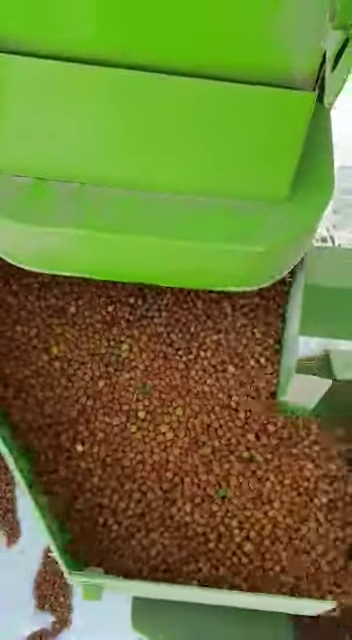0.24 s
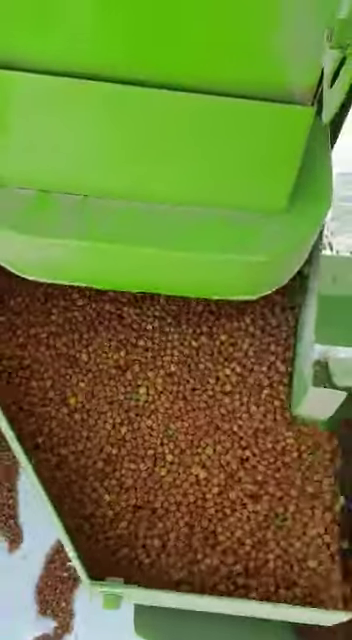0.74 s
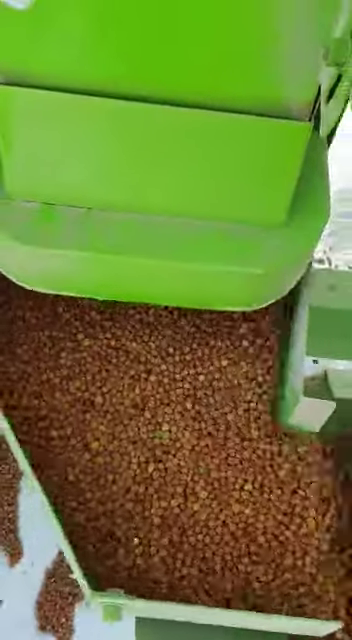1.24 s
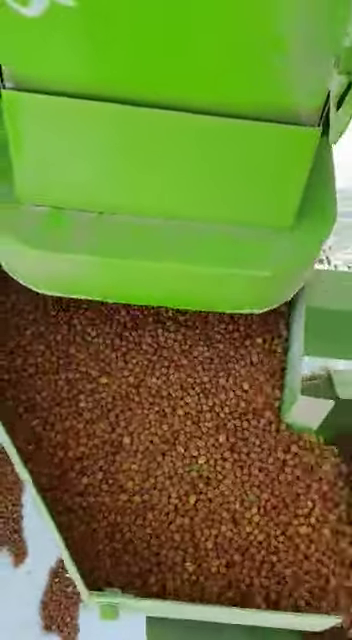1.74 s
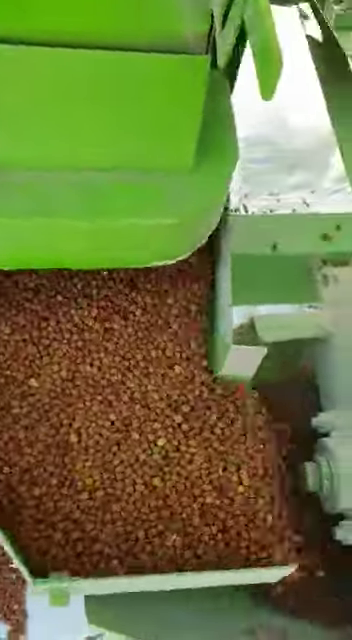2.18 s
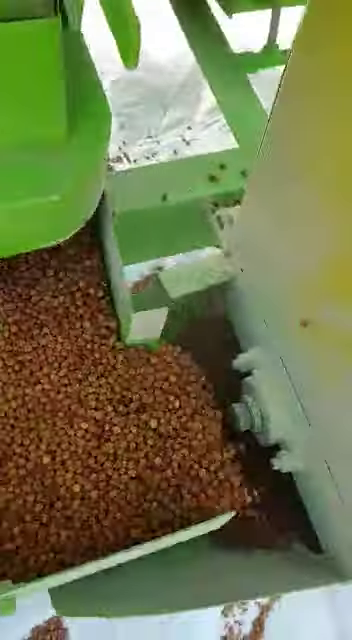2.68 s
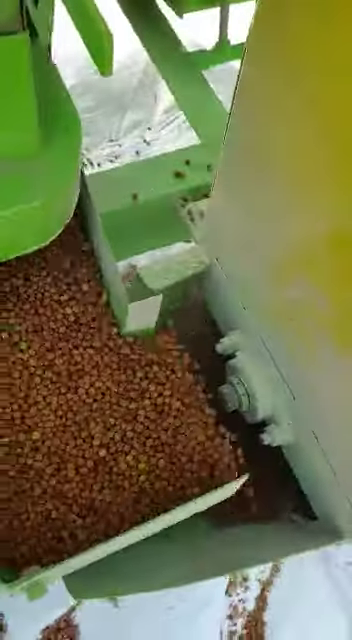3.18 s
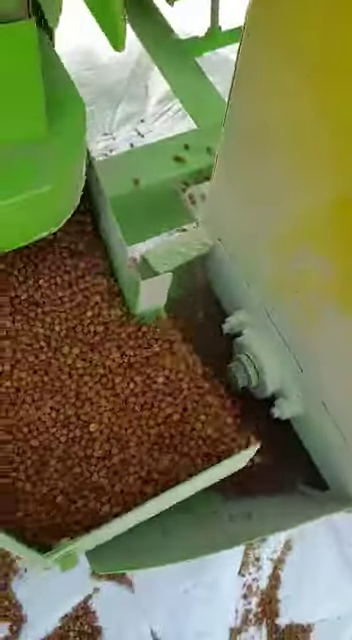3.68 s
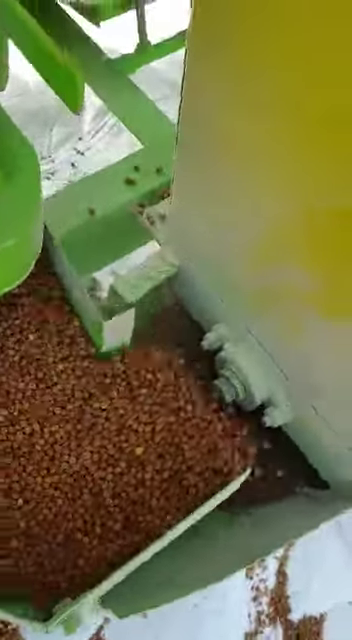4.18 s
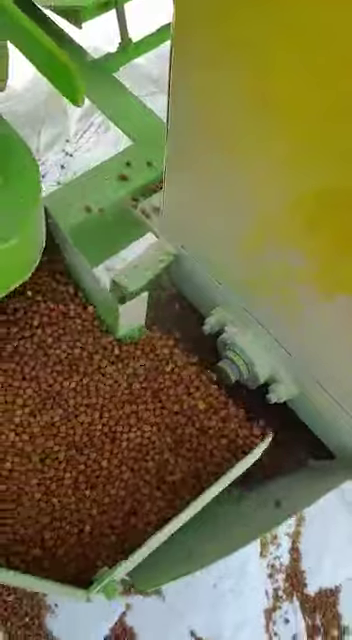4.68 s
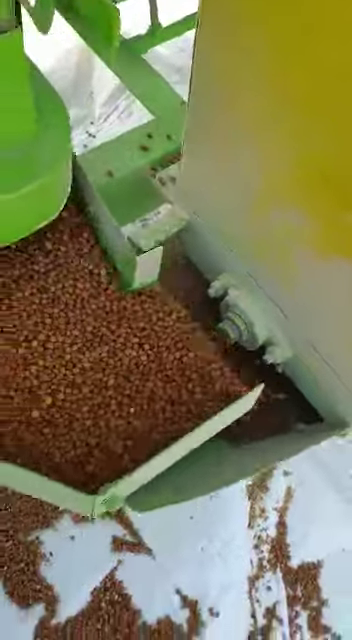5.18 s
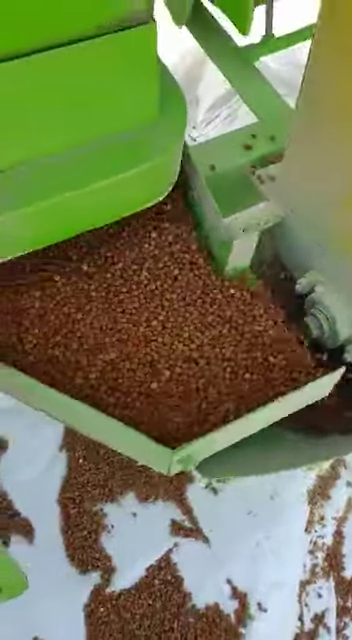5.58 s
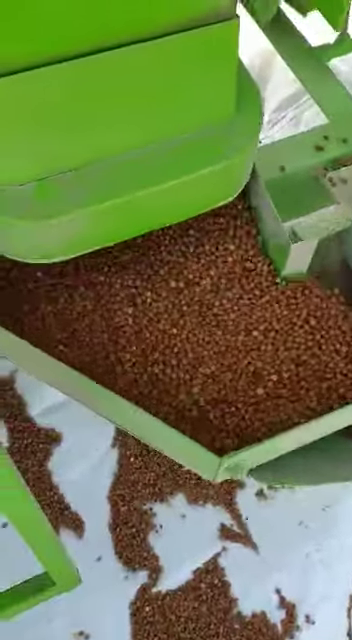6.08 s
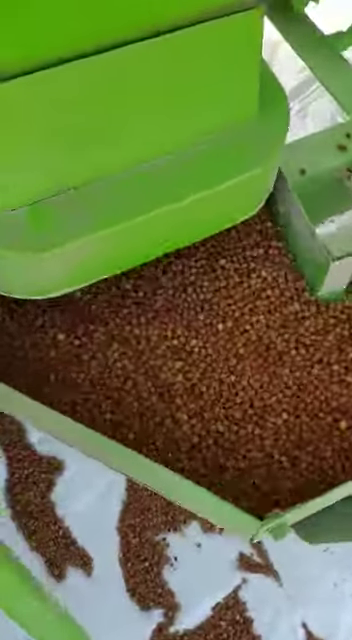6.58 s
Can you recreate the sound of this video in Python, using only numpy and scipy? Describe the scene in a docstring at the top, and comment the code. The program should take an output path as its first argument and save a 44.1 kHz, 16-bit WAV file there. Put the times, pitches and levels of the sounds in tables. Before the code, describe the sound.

From 0 to about 6.8 seconds a thresher works without pause, heard outdoors from a close handheld phone. A tractor diesel gives a steady, very low throbbing tone, with wavering overtones and a rough growl. Pods tumble in a sheet-metal drum, rumbling unevenly, with soft heavy thumps several times a second; strong ones land near 1.1, 1.7, 3.8, 5.3 and 5.7. Blower air rushes through a hollow, ringing chute, and nuts make a dense, bright rattle on a sieve shaking about six times a second. Around 2.1 to 3.2 the chute roar recedes and turns duller, with a low gust near 3.2. Small metallic knocks come near 1.5, 3.2 and 3.4. From about 6.25 the roar opens up, leaning right, with more knocks. Bass is much stronger on the right; treble spreads wide. It ends still running.

```python
"""A tractor diesel drives a thresher close to a hand-held phone; the exhaust throbs on one clean low tone.
Overtones and blower shaft tones waver above it, and the engine block growls as coloured noise.
The drum tumbles pods against its sheet-metal casing: patchy noise and struck resonances.
A blower roars through a ringing chute, and nuts rattle as clicks over a shaking sieve.
The phone's two ports hear the bass alike, the right one much louder, and the treble apart."""
import sys
import numpy as np
from scipy import signal
from scipy.fft import rfft, irfft, next_fast_len
from scipy.io import wavfile
from scipy.ndimage import uniform_filter1d, minimum_filter1d, map_coordinates

SR = 44100
rng = np.random.default_rng(int(sys.argv[2]) if len(sys.argv) > 2 else 0)


def waveform_to_disk(signal):
    """Save audio, clipped to [-1, 1], as 16-bit WAV at the path in sys.argv[1]."""
    frames = np.transpose(np.atleast_2d(signal))
    scaled = np.clip(frames, -1, 1) * 32767
    samples = np.round(scaled).astype(np.int16)
    wavfile.write(sys.argv[1], SR, samples)


N = 301644

# Air and rattle as the phone turns: start_s, chute_roar_db, dull_roar_db, bright_roar_db, fine_rattle_db,
# balance_db (left minus right; only its change about the mean is used)
PHONE_AIM = [(0.0, -40.5, -36, -40.5, -38.5, -1), (0.7, -38, -38.5, -40, -39, -0.5),
             (1.5, -38, -38, -41, -38, -2), (1.75, -38.5, -38, -43, -40, 0.5),
             (2.13, -45, -35.5, -40, -40, -2), (2.45, -42.5, -38, -41, -39.5, -1),
             (2.9, -47.5, -35.5, -43.5, -40, 0.5), (3.1, -44, -38, -42.5, -39.5, 0),
             (3.2, -40.5, -30.5, -41, -42, 0), (3.3, -45, -33, -42.5, -41, 0.5),
             (3.5, -41.5, -39, -42, -40, 1), (3.9, -39, -36, -43, -40, 0),
             (4.2, -41.5, -37, -41, -39, -0.5), (4.5, -39.5, -33.5, -39.5, -39, 0),
             (5.0, -41.5, -39.5, -42, -40, -0.5), (5.75, -43, -31.5, -42, -40, 1.5),
             (6.15, -41.5, -46, -42, -40, 1), (6.25, -39, -36, -40.5, -40, -3.5),
             (6.37, -38, -39, -38, -37.5, -3.5), (6.5, -34.5, -37, -40, -38.5, -3.5),
             (6.68, -37.5, -35.5, -37.5, -38.5, -4.5), (6.84, -36, -38, -40, -37.5, -4)]
# Resonances of the blower chute: centre_hz, width_hz, relative_db
CHUTE_MODES = [(630, 71, -4), (774, 24, 2), (873, 13, -5), (982, 8, 3.5), (1123, 17, 4.5), (1160, 12, 4),
               (1190, 100, -3), (1445, 25, 0)]


def amp(db):
    """dB to gain."""
    return 10 ** (np.asarray(db) / 20)


def unit(x):
    """Scaled to rms 1."""
    return x / np.sqrt(np.mean(x ** 2) + 1e-20)


def along(points, hz):
    """Each column after the frequency, interpolated on a log frequency axis."""
    f, *cols = np.transpose(points)
    return [np.interp(np.log(hz + 1), np.log(f + 1), c) for c in cols]


def curves(rows):
    """One value per sample for each column after the time."""
    s, *cols = np.transpose(rows)
    return [np.interp(np.arange(N) / SR, s, c) for c in cols]


def wobble(rate):
    """A smooth random curve, rate knots a second."""
    knots = rng.standard_normal(int(N * rate / SR) + 4)
    return map_coordinates(knots, [np.arange(N) * rate / SR])


def swells(times, tops, rise, fall):
    """One quick rise and slower fall (seconds) from each time, up to its top; overlaps add."""
    t = np.arange(SR // 2) / SR
    shape = (1 - np.exp(-t / rise)) * np.exp(-t / fall)
    starts = np.bincount(np.clip(times * SR, 0, N).astype(int), tops, N + 1)
    return signal.fftconvolve(starts, shape / shape.max())[:N]


def filtered(x, response):
    """x times a complex response of frequency."""
    m = next_fast_len(N + 4096, True)
    return irfft(rfft(x, m) * response(np.fft.rfftfreq(m, 1 / SR)), m)[..., :N]


def split(x, hz):
    """The parts below and above a crossover; they add up to x."""
    low = filtered(x, lambda f: 1 / (1 + (f / hz) ** 6))
    return low, x - low


def modes(table):
    """Response of a body as a sum of resonances with alternating sign."""
    def response(hz):
        total = 0
        for k, (centre, width, db) in enumerate(table):
            damping = 1j * hz * width
            total = total + (-1) ** k * amp(db) * damping / (centre * centre - hz * hz + damping)
        return total
    return response


def blows(events, table, contact):
    """Soft pushes of the given contact time (s) ring the body; heard as direct sound."""
    m = SR // 2
    push = np.hanning(round(contact * SR))
    ring = irfft(rfft(push, m) * modes(table)(np.fft.rfftfreq(m, 1 / SR)), m)[:m // 4]
    hits = np.zeros(N)
    for s, db in events:
        hits[round(s * SR)] = amp(db)
    direct = signal.fftconvolve(hits, ring / np.abs(ring).max())[:N]
    return direct * [[1], [0]]


def stream(spectrum, patchy_db, per_s, spread_db, share):
    """Two unrelated coloured streams: patchy noise with a share of single impacts of uneven size."""
    z = signal.stft(rng.standard_normal((2, N)), nperseg=512)[2]
    field = uniform_filter1d(rng.standard_normal(z.shape[1:]), size=6, axis=0)  # across frequency
    field = uniform_filter1d(field, size=10, axis=1)  # across time
    noise = signal.istft(z * amp(patchy_db * unit(field)), nperseg=512)[1][:, :N]
    when, size, push = rng.random((int(2 * per_s * N / SR), 3)).T
    strength = amp(-spread_db * np.log(1.02 - size)) * (push - .5)
    impacts = np.bincount((when * 2 * N).astype(int), strength, 2 * N).reshape(2, N)
    share = np.clip(share, 0, 1)  # share of the power
    mix = np.sqrt(1 - share) * unit(noise) + np.sqrt(share) * unit(impacts)
    return unit(filtered(mix, lambda hz: amp(along(spectrum, hz)[0])))


def ports(pair):
    """Left and right from a direct and a scattered stream; their average keeps the level of one stream."""
    # The phone's two ports: freq_hz, left_minus_right_db, likeness (0-1), left_lead_rad
    port_pair = [(40, -12, 0.75, 0.17), (100, -11, 1, 0.31), (250, -11.5, 0.92, 0.33),
                 (345, -13.5, 0.98, 1.1), (473, -10.5, 0.68, 1.17), (860, -6, 0.4, 1.38),
                 (1220, -4.5, 0.2, 2.33), (1930, -4, 0.2, 4.7), (2860, 4.5, 0.2, 7.45),
                 (4450, 3.5, 0.1, 7.2), (6200, 12, 0.1, 8.5), (8160, 1.5, .2, 17), (9600, 2, .05, 19.5),
                 (15200, -6, 0.2, 32)]

    def response(hz):
        lean_db, alike, lead = along(port_pair, hz)
        turn = np.arccos(np.clip(alike, 0, 1)) / 2  # more scattered sound, less likeness
        g = amp(lean_db)
        scale = 2 / np.sqrt(1 + g * g + 2 * g * np.cos(2 * turn) * np.cos(lead))
        left = scale * g * np.exp(.5j * lead)
        right = scale * np.exp(-.5j * lead)
        return np.array([[left * np.cos(turn), left * np.sin(turn)],
                         [right * np.cos(turn), -right * np.sin(turn)]])
    return filtered(pair, response).sum(axis=1)


def panned(x, pan_db):
    """Leans the pair by the change of balance about its mean."""
    lean_db = (pan_db - pan_db.mean()) / 2
    return x * amp([lean_db, -lean_db])


def engine_and_shaft_tones():
    """The firing tone is steady and clean; overtones and blower shaft tones waver in level and phase."""
    # Exhaust firing tone: start_s, firing_hz, level_db (rms)
    firing = [(0.0, 46.7, -20), (0.5, 46.42, -21), (1.0, 46.83, -20), (2.0, 46.31, -20.5),
              (2.6, 46.62, -20.5), (4.5, 46.84, -20.5), (5.5, 46.35, -20.5), (6.4, 46, -21.5),
              (6.84, 46.5, -20)]
    # Exhaust and block overtones: multiple of the firing rate, level_db (rms, before wavering)
    exhaust_overtones = [(2, -40), (3, -37), (3.5, -41), (4, -38.5), (4.5, -35.5), (5, -37.5), (6, -38.5),
                         (6.5, -40.5), (7.5, -37), (9, -55), (13.5, -63)]
    # Blower shaft tones: multiple of the shaft rate, level_db (rms, before wavering)
    shaft_tones = [(2, -40.5), (3, -37.5), (4, -46), (6, -40)]
    shaft_ratio = .6215  # shaft turns for each firing
    rate_hz, level_db = curves(firing)
    turn = 2 * np.pi * np.cumsum(rate_hz) / SR
    out = amp(level_db + 0.28 * wobble(4.62)) * np.sin(turn + .03 * wobble(9.7))
    partials = list(exhaust_overtones) + [(k * shaft_ratio, db) for k, db in shaft_tones]
    for k, db in partials:
        phase = 2 * np.pi * rng.random() + .7 * wobble(5)
        out += amp(db + 3 * wobble(5)) * np.sin(k * turn + phase)
    return np.array([np.sqrt(2) * out, np.zeros(N)])  # direct sound only; peak to rms level


def growl():
    """The engine block growls under everything, as low noise with a share of impacts."""
    # Colour of the growl: freq_hz, relative_db_per_hz
    block_colour = [(15, -42), (30, -15), (38, -4), (50, -8), (62, -6), (75, -3.5), (100, -4), (200, -6.5),
                    (330, -2.5), (450, -17.5), (700, -39), (1200, -120)]
    # Rise and fall of the growl: start_s, level_db
    block_level = [(0, -27), (.7, -33), (1.3, -22.5), (2, -32.5), (2.6, -26), (3.3, -27), (4, -29),
                   (4.5, -23), (5, -28.5), (5.6, -29.5), (6.2, -25.5), (6.84, -26.5)]
    level = amp(curves(block_level)[0] + 0.36 * wobble(2.73))
    return level * stream(block_colour, patchy_db=0.8, per_s=350, spread_db=3.0, share=0.09)


def drum():
    """Tumbling pods drive the casing; heavy lumps give single soft thumps and a short surge of tumbling."""
    # Colour of tumbling pods: freq_hz, relative_db_per_hz
    pod_colour = [(60, -52), (120, -5.5), (180, -6.5), (250, -5), (350, -7.5), (440, -12.5), (600, -16.5),
                  (900, -88), (1400, -120)]
    # Sheet-metal casing panels: centre_hz, width_hz, relative_db
    panels = [(131, 39, -7.5), (170, 15.8, 0), (233.7, 27.6, 0.5), (245.3, 11.1, 2.5), (259.1, 20.5, 1),
              (312.5, 36, -6), (344.5, 22, -0.5), (395, 66, -8.5)]
    # The air inside a full drum: centre_hz, width_hz, relative_db
    drum_air = [(246.5, 120, 1)]
    # Load in the drum: start_s, rumble_db
    drum_load = [(0.0, -24.5), (0.3, -21.5), (0.55, -22.5), (0.62, -23), (0.75, -19.5), (1.08, -27.5),
                 (1.3, -26), (1.6, -21.5), (1.9, -21), (2.08, -18.5), (2.17, -30), (2.3, -26.5),
                 (2.55, -27), (2.9, -31), (3.7, -26.5), (4.25, -28.5), (4.7, -23.5), (4.95, -21),
                 (5.06, -22), (5.17, -27.5), (5.4, -24.5), (5.55, -30.5), (6.05, -25.5), (6.2, -24),
                 (6.4, -26.5), (6.6, -26), (6.84, -37)]
    # Heavy lumps striking the casing: start_s, peak_db, surge_db (tumbling that comes with the lump)
    lumps = [(0.211, -14, -28), (0.298, -10, -23), (.42, -21, -27), (.513, -11.5, -37), (.71, -15, -29),
             (0.802, -11, -27), (.95, -24, -29), (1.039, -29, -31), (1.142, -8.5, -17), (1.337, -10, -37),
             (1.452, -17, -33), (1.738, -4.5, -33), (1.835, -22, -21.5), (1.958, -15, -26),
             (2.049, -10, -21), (2.249, -23, -25), (2.382, -16, -33), (2.72, -18, -29), (2.929, -16, -27.5),
             (3.19, -13.5, -21.5), (3.575, -17, -37), (3.7, -25, -30), (3.836, -10, -20), (3.95, -18, -29),
             (4.116, -21, -34), (4.263, -15, -39), (4.372, -14, -29), (4.462, -29, -25), (4.529, -14, -23),
             (4.765, -13, -24.5), (4.887, -13, -25.5), (4.988, -15, -20.5), (5.315, -9, -23),
             (5.373, -18, -40), (5.738, -6, -22.5), (6.13, -32, -21), (6.33, -24, -29),
             (6.455, -11.5, -16.5), (6.642, -14, -25.5)]
    rise_s, fall_s = 0.01, 0.071  # surge of pods

    pods = stream(pod_colour, patchy_db=0.5, per_s=160, spread_db=2.5, share=0.24)
    # part escapes through the open feed without ringing the panels
    ringing = unit(filtered(pods, lambda hz: amp(-10.0) + modes(panels)(hz)))
    load = amp(curves(drum_load)[0] + 0.32 * wobble(29))

    s, peak_db, surge_db = np.transpose(lumps)
    surge_power = np.abs(swells(s - rise_s, amp(surge_db) ** 2, rise_s, fall_s))
    muffled = stream(pod_colour, patchy_db=0.5, per_s=90, spread_db=0.5, share=0.13)
    # a full drum sounds through its air and then its panels
    boom = unit(filtered(muffled, lambda hz: (amp(-10.0) + modes(drum_air)(hz)) * modes(panels)(hz)))
    thumps = blows(zip(s, peak_db), panels, contact=0.003)
    return load * ringing + np.sqrt(surge_power) * boom + thumps


def blower():
    """The air stream roars through the chute; how much of each part is heard follows the phone's aim."""
    # Colour of the air stream: freq_hz, relative_db_per_hz
    air_colour = [(240, -17), (400, 6), (433, 3.5), (680, -9.5), (788, -9), (922, -13), (1140, -17),
                  (1610, -18), (1770, -17), (2910, -23), (3200, -23), (4160, -27), (7040, -120)]
    # How clearly the chute rings as the phone turns away and back: start_s, ring_db
    chute_ring = [(0, 0), (.6, 0.5), (1.5, -4), (2.2, -0.5), (3, 0.5), (4.3, -14), (6.1, -6.5), (6.3, -25),
                  (6.84, -7)]
    # Roar between its dull part and the chute's ring: start_s, level_db
    hollow_level = [(0.0, -42.5), (0.86, -44), (1.2, -39.5), (1.58, -47.5), (1.85, -44), (2.02, -39),
                    (2.27, -39), (2.53, -41), (3.29, -40), (3.58, -44), (3.98, -37), (6.11, -40.5),
                    (6.69, -38), (6.84, -40)]
    chute_db, dull_db, bright_db, _, pan_db = curves(PHONE_AIM)
    air = stream(air_colour, patchy_db=1, per_s=700, spread_db=1.0, share=0.14)
    rung = filtered(air, lambda hz: np.abs(modes(CHUTE_MODES)(hz)))
    low, rest = split(air + amp(curves(chute_ring)[0]) * rung, hz=852)
    dull, hollow = split(low, hz=572)
    chute, bright = split(rest, hz=1610)
    roar = amp(dull_db) * unit(dull) + amp(curves(hollow_level)[0]) * unit(hollow)
    roar += amp(chute_db) * unit(chute) + amp(bright_db) * unit(bright)
    return panned(ports(roar + knocks()), pan_db)


def sieve():
    """Nuts click on the sieve; jolts and spills make them jump, lulls quieten them, the finest clicks most."""
    # Colour of the clicking nuts: freq_hz, relative_db_per_hz
    nut_colour = [(1200, -13), (2000, -6.5), (2900, -7), (4100, -0.5), (4830, -1), (5790, -3.5),
                  (7200, -11), (8550, -16.5), (10000, -8), (11700, -2), (13500, -2.5), (15000, -3),
                  (15600, -6), (17000, -17)]
    # Jolts within one stroke of the sieve: place in the stroke (0-1), swell_db (before scatter)
    stroke_jolts = [(.13, 3), (.345, 2.4), (.735, 3.3)]
    # Spills of nuts onto the sieve, and brief lulls (negative): start_s, swell_db
    # (the mean of all swells over time is taken out below)
    spills_and_lulls = [(.145, 2), (.613, 1.5), (.875, 2), (1.031, 2), (1.42, -1), (2.23, 0), (3.144, 3.5),
                        (3.293, 4.5), (3.6, 3.5), (3.7, 3.5), (4.03, 2.5), (4.36, 4), (4.509, 2.5),
                        (4.665, 3), (4.733, 1.5), (4.835, 4), (5.476, 2.5), (6.195, 0.5), (6.292, 3.5),
                        (6.357, -1.5), (6.523, -2), (6.77, -1.5)]
    shake_hz, strokes = 6.16, 45
    scatter_s, scatter_db = 0.0045, 0.4  # unevenness of the jolts

    fine_db, pan_db = curves(PHONE_AIM)[-2:]
    coarse_db = fine_db + 2.5
    place, jolt_db = np.transpose(stroke_jolts)
    late, harder = rng.standard_normal((2, strokes, len(place)))
    jolts = (np.arange(strokes)[:, None] + place) / shake_hz + scatter_s * late
    s, change_db = np.transpose(spills_and_lulls)
    times = np.append(jolts, s)
    tops_db = np.append(jolt_db + scatter_db * harder, change_db)
    swell_db = swells(times, tops_db, rise=0.0054, fall=0.03)
    swell_db = swell_db - swell_db.mean() + .3 * wobble(22) + .7 * wobble(55)

    clicks = stream(nut_colour, patchy_db=1.3, per_s=2600, spread_db=0.5, share=0.17)
    coarse, fine = split(clicks, hz=6900)
    nuts = amp(coarse_db + 0.64 * swell_db) * unit(coarse) + amp(fine_db + swell_db) * unit(fine)
    return panned(ports(nuts), 0.8 * pan_db)  # the rattle leans less than the roar


def knocks():
    """Each knock rings the chute, most strongly in the resonances near the struck spot."""
    # Knocks on the chute: start_s, peak_db, spot_hz (resonance nearest the struck spot)
    chute_knocks = [(1.455, -23, 977), (1.473, -19, 780), (1.491, -25, 834), (3.178, -19, 780),
                    (3.409, -24, 790), (.6, -26, 1140), (1.039, -25, 799), (2.069, -24, 735),
                    (3.889, -28, 826), (4.309, -24, 640), (4.367, -27, 646), (6.231, -26, 759),
                    (6.357, -27, 1000), (6.469, -25, 980), (6.544, -25, 808), (6.668, -22, 1150),
                    (6.72, -26, 1430)]
    reach_octaves = 0.37  # distance at which a resonance is 6 dB down
    total = 0
    for s, db, near in chute_knocks:
        struck = [(c, w, mode_db - 6 * (np.log2(c / near) / reach_octaves) ** 2)
                  for c, w, mode_db in CHUTE_MODES]
        total = total + blows([(s, db)], struck, contact=0.001)
    return total


def scene():
    """Engine, drum, blower and sieve together."""
    return ports(engine_and_shaft_tones() + growl() + drum()) + blower() + sieve()


def record(dry):
    """A fast limiter ducks both channels around peaks over 0.99; nothing is kept above the band limit."""
    top_hz = 15950
    need = np.minimum(1, .99 / (np.abs(dry).max(axis=0) + 1e-9))
    gain = uniform_filter1d(minimum_filter1d(need, size=441), size=221)  # 10 ms hold, 5 ms smoothing
    return filtered(dry * gain, lambda hz: hz < top_hz)


dry = scene()
out = record(dry)
waveform_to_disk(out)
```